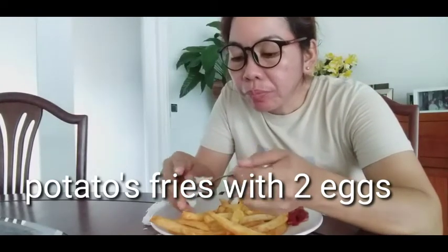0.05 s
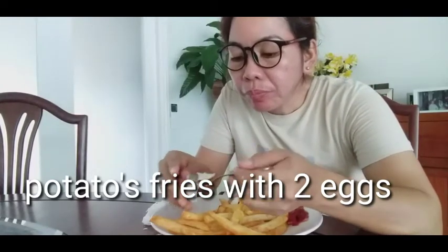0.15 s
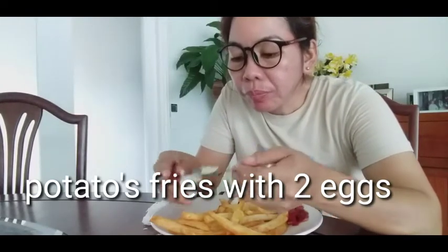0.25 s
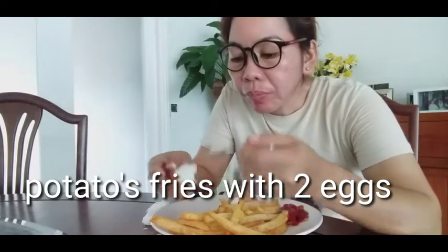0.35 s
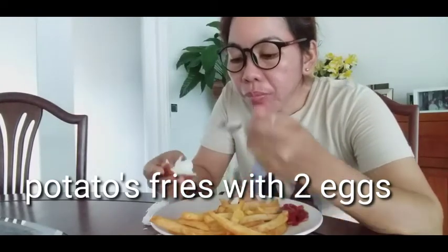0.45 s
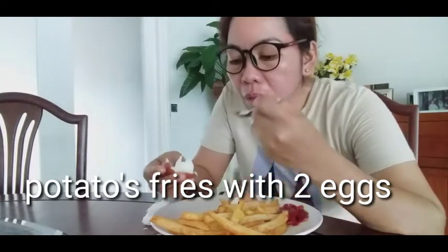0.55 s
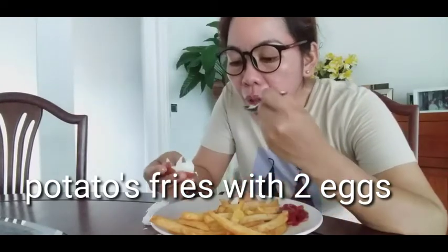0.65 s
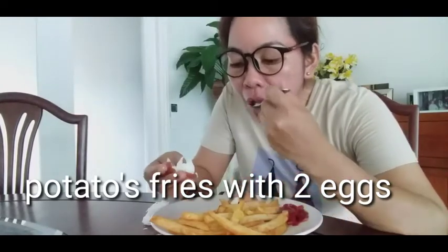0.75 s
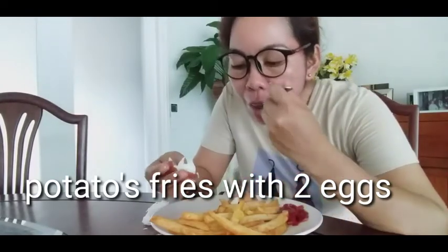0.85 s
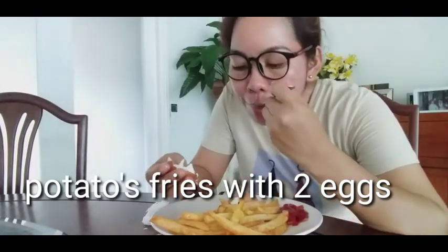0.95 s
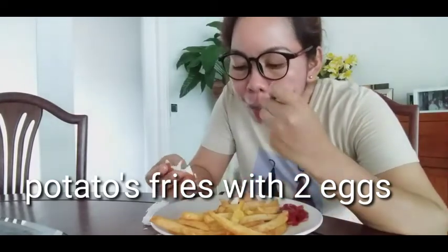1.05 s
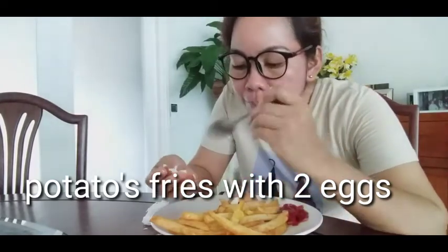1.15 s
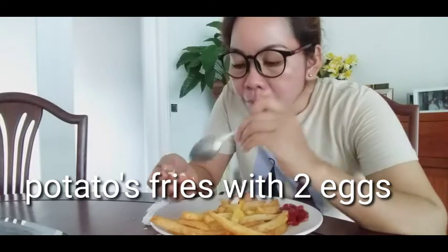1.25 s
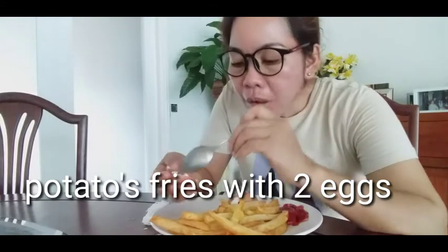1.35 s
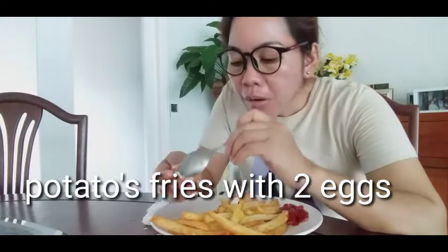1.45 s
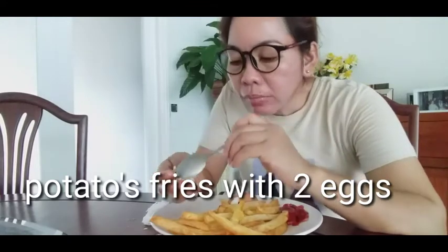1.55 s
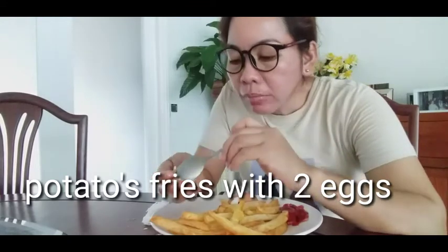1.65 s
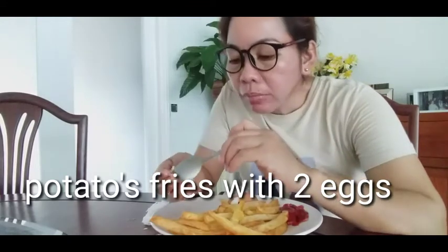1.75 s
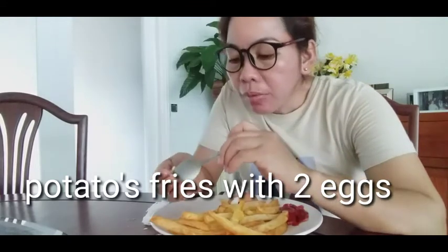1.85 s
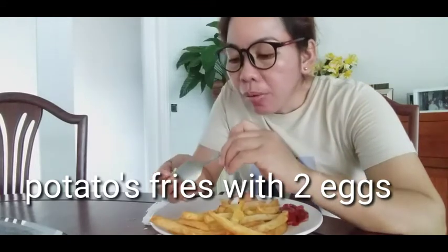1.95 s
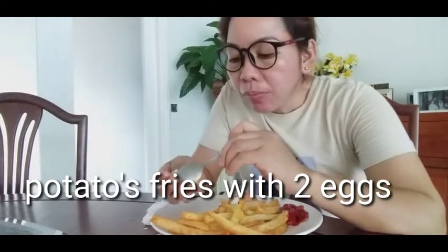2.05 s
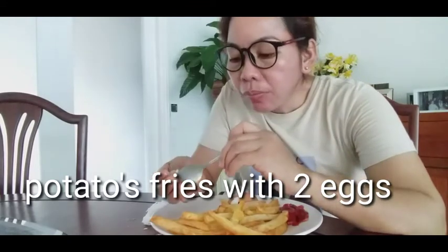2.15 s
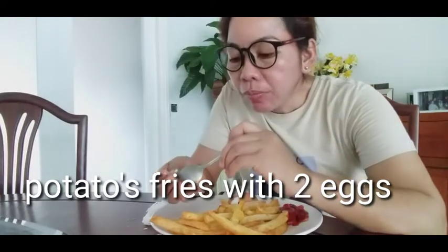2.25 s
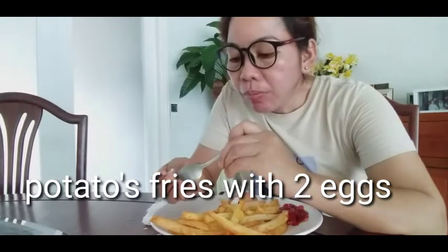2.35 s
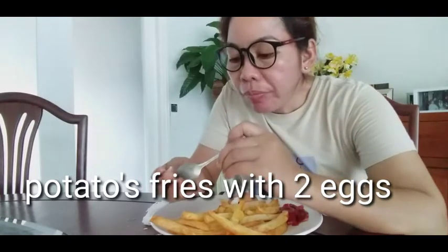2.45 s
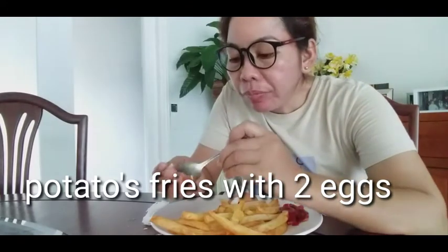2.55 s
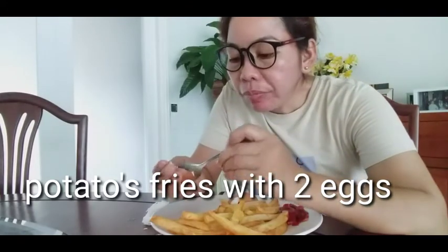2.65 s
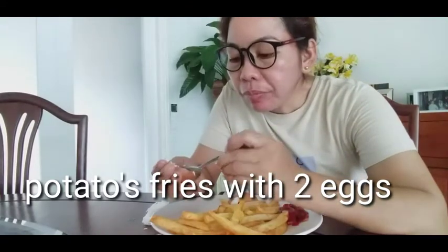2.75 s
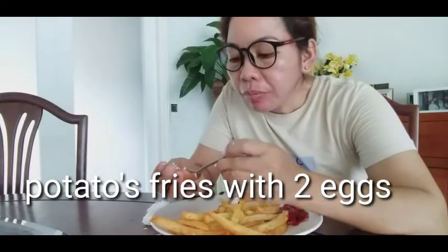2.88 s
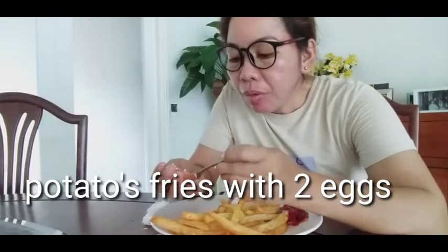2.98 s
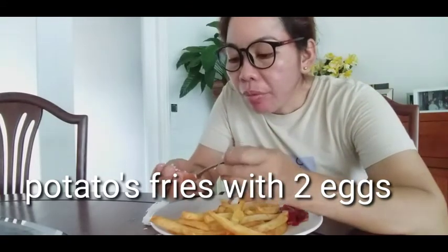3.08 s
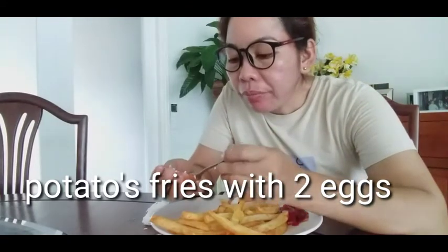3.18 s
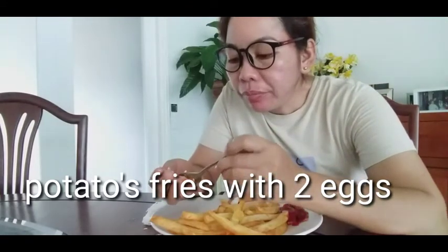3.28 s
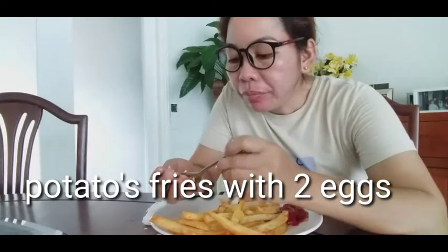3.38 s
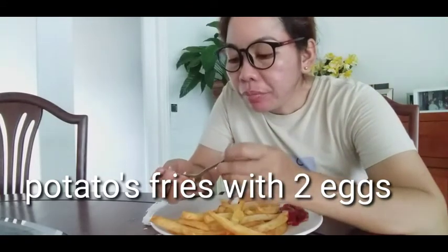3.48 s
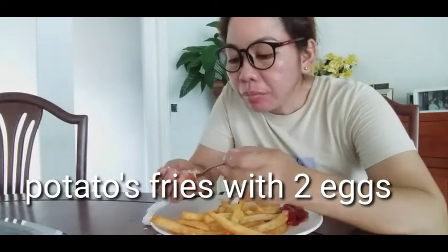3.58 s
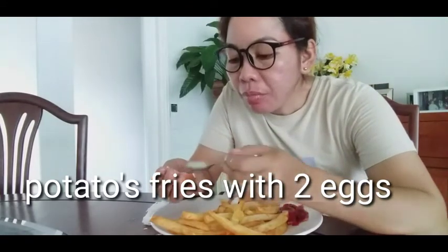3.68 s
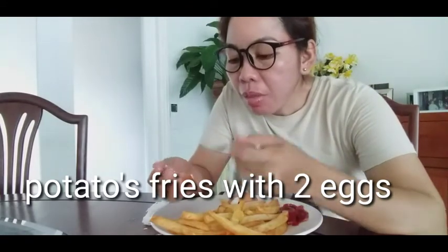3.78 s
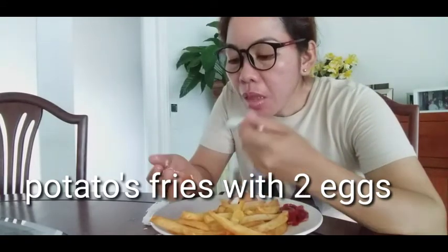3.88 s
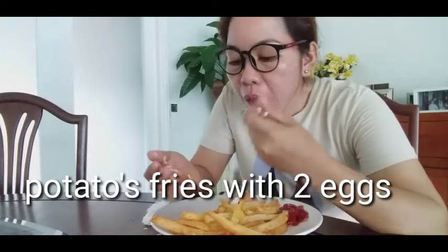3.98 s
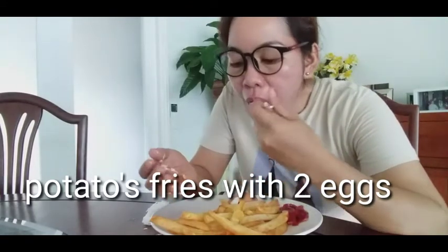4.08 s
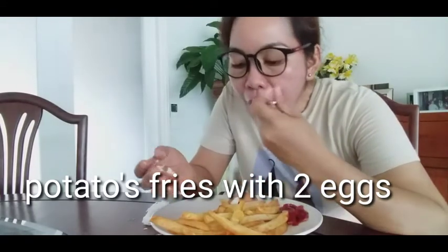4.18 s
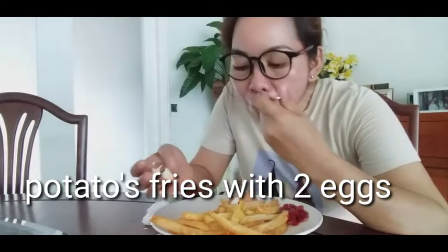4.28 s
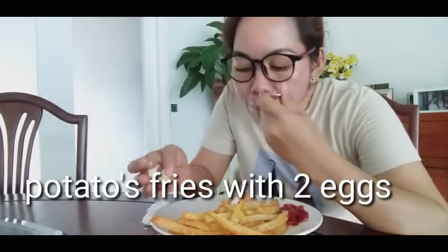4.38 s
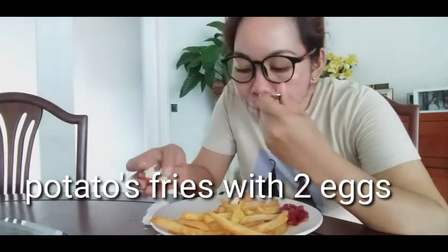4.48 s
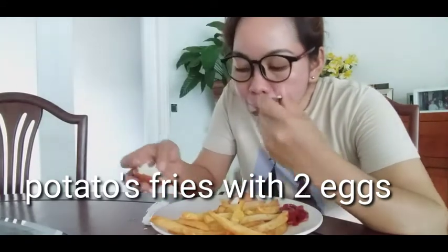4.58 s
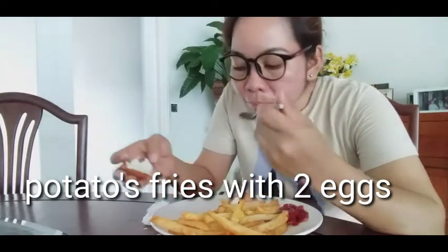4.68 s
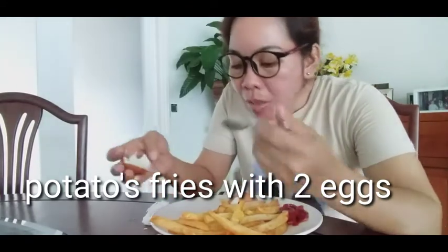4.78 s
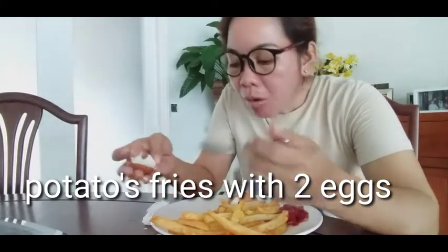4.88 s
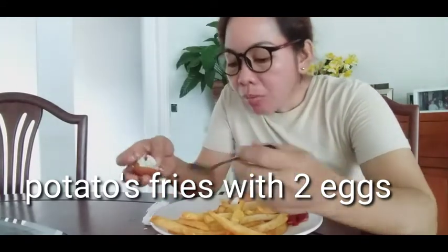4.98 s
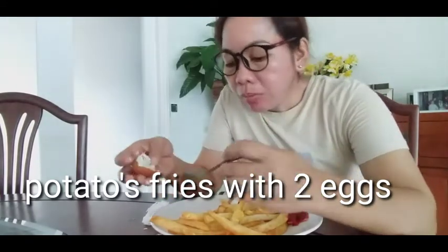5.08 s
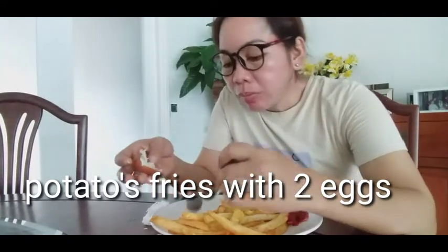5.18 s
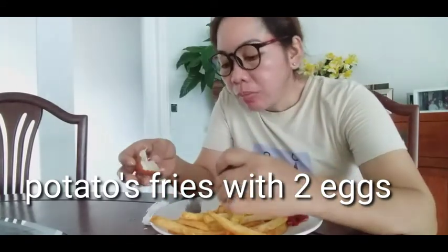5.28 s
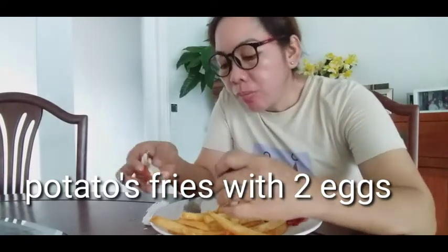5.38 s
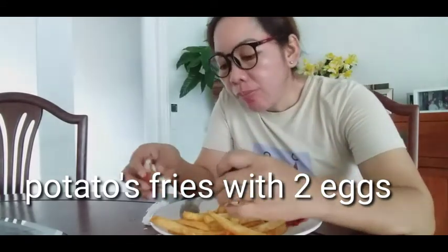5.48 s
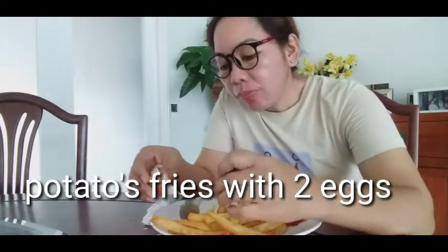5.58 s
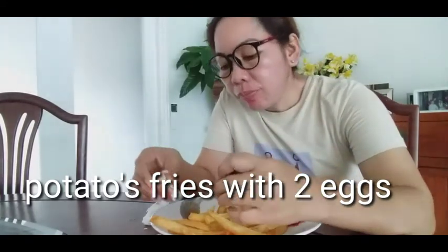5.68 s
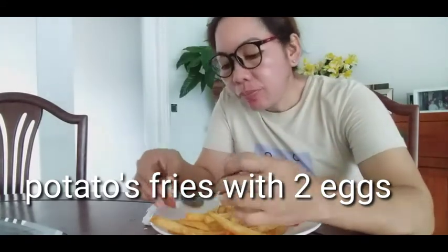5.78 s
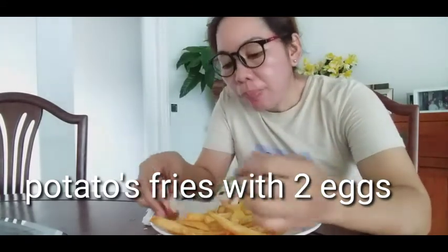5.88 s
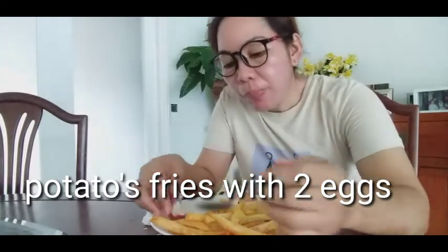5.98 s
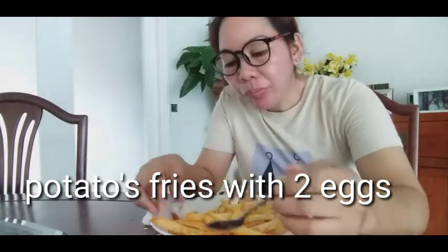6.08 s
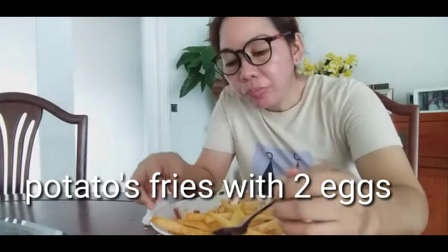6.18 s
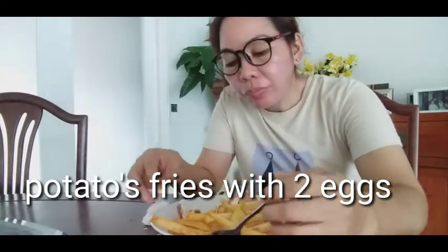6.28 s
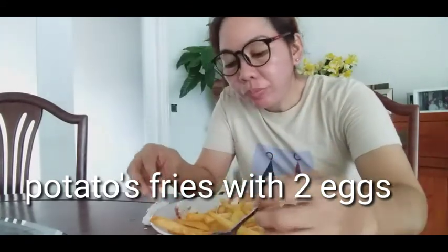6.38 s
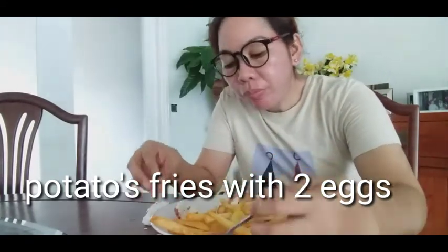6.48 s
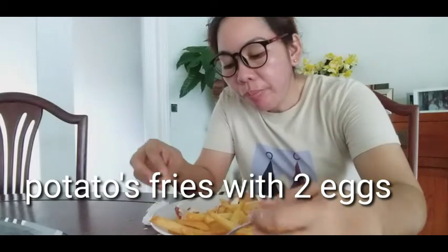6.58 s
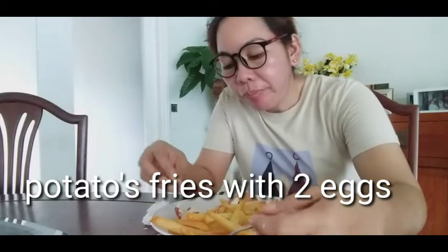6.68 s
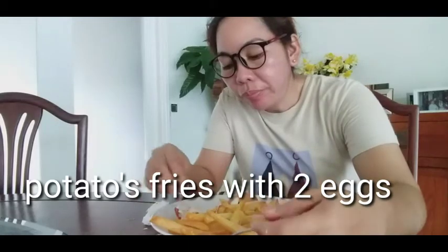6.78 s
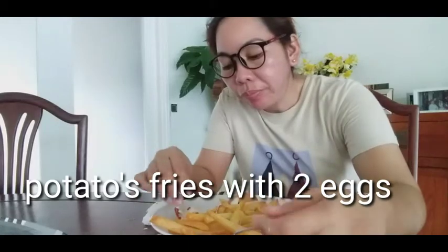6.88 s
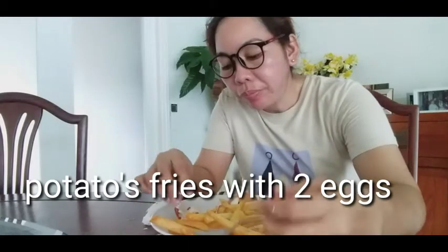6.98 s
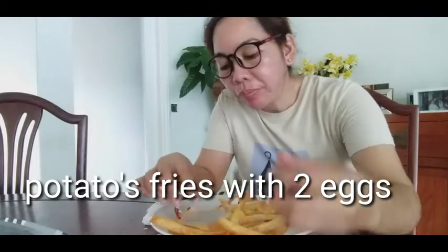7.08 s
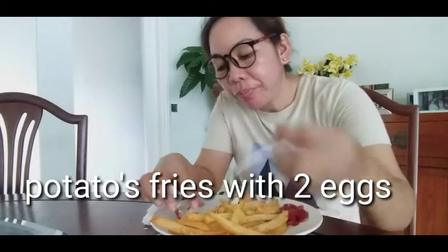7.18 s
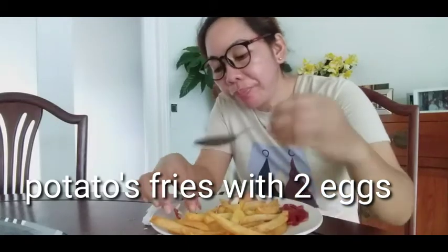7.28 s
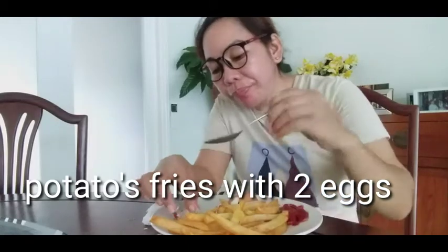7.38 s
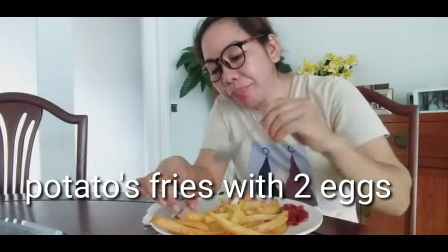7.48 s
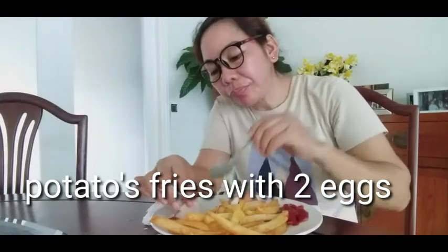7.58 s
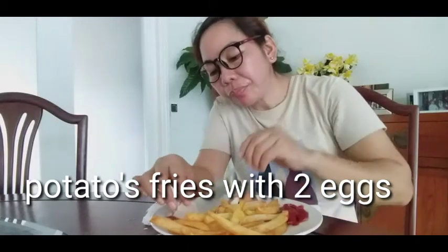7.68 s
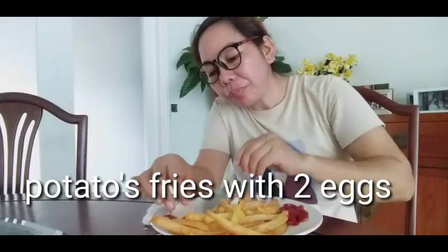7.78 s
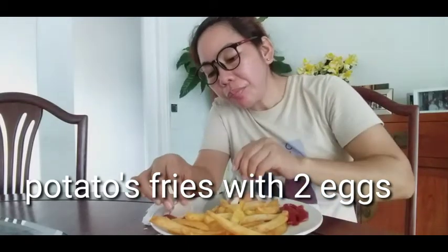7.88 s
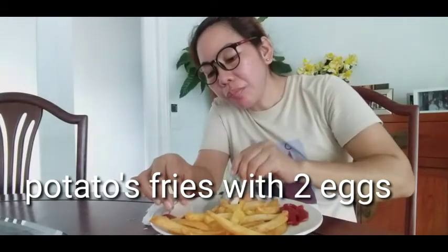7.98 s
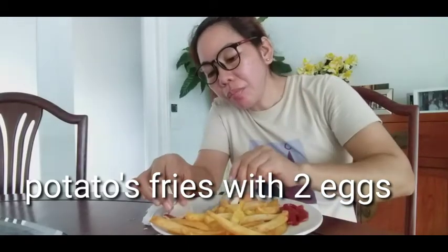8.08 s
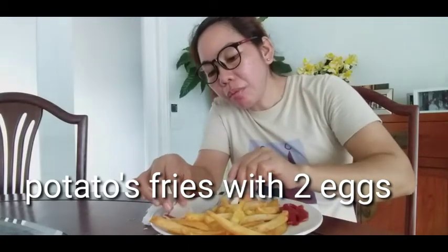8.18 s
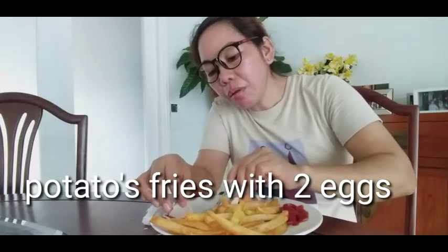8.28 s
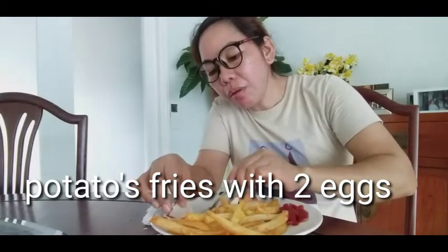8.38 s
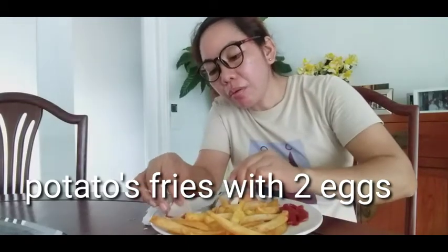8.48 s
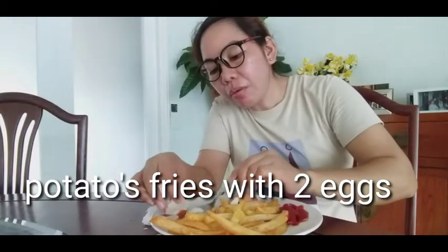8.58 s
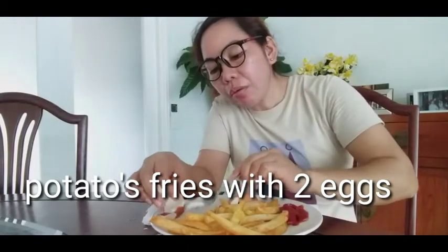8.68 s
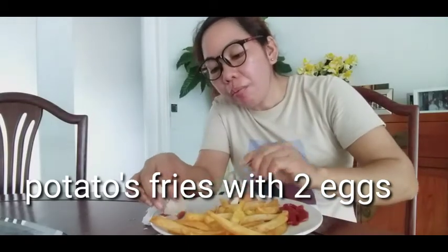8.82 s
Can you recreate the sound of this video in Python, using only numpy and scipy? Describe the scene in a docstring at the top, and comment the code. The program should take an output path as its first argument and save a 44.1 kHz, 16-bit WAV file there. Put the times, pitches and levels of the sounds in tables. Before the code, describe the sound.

Quiet table sounds, picked up by a small microphone with thin bass in a hard-walled room. A far engine rises in pitch and dies away over mains hum and hiss. After a light knock, eggshell cracks in small dry ticks, strongest early on. Later come bright metallic clinks of cutlery on a plate, three clear and one weak, ending in a short high scrape and a tiny falling squeak.

```python
"""Mains hum, room noise and a far engine, speeding up and slowly fading, come first; a light knock follows.
At a wooden dining table in a bare, ringing room, bits of eggshell then snap and crackle: bursts of noise and clicks.
Steel cutlery clinks on a ceramic plate four times, as struck modes with a crack and a thump of the table.
Last it is dragged over the glaze and squeaks as it slides off: random slips ringing damped resonances.
The microphone gets the table sounds directly and off the walls; engine and background have no added room."""
import sys
import numpy as np
from scipy import signal
from scipy.fft import rfft, irfft, next_fast_len
from scipy.io import wavfile

SR = 44100
rng = np.random.default_rng(int(sys.argv[2]) if len(sys.argv) > 2 else 0)


def log_audio(samples):
    """Write samples as a 16-bit WAV file to the path given in sys.argv[1]."""
    # one column per channel
    frames = np.atleast_2d(samples).T
    # limit to full scale, then quantise
    limited = np.clip(frames, -1, 1)
    pcm = np.round(limited * 32767).astype(np.int16)
    wavfile.write(sys.argv[1], SR, pcm)


N = 390285


def from_db(db):
    """Decibels to gain."""
    return 10 ** (np.asarray(db) / 20)


def rms_one(x):
    """Scale to rms 1."""
    return x / np.sqrt(np.mean(x ** 2) + 1e-20)


def at_hz(points, hz):
    """Read a table on a log-frequency axis."""
    known, values = np.transpose(points)
    return np.interp(np.log(hz), np.log(known), values)


def seconds(length):
    """A time axis of the given length in seconds."""
    return np.arange(int(length * SR)) / SR


def add(out, s, sound):
    """Mix a sound in at a time in seconds."""
    at = int(s * SR)
    out[at:at + len(sound)] += sound[:len(out) - at]


def band(x, low_hz, high_hz):
    """Causal band-pass, kept at least 100 Hz wide."""
    high_hz = np.clip(high_hz, low_hz + 100, 20000)
    sos = signal.butter(2, [low_hz, high_hz], "band", fs=SR, output="sos")
    return signal.sosfilt(sos, x + 1e-18)


def noise(spectrum, size, tilt_db=0):
    """Noise of a given colour, tilted by so many dB an octave; rms 1."""
    hz = np.maximum(np.fft.rfftfreq(size, 1 / SR), 1)
    gain = from_db(at_hz(spectrum, hz) + tilt_db * np.log2(hz))
    white = rng.standard_normal(size)
    return rms_one(irfft(rfft(white) * gain, size))


def fade(t, t60):
    """Exponential decay, falling 60 dB in t60 seconds."""
    return np.exp(-np.log(1000) * t / t60)


def gesture(start, length, attack, t60):
    """Envelope of a movement: rises, holds until its length is over, dies away."""
    t = np.arange(N) / SR - start
    return np.clip(t / attack, 0, 1) * fade(np.maximum(t - length, 0), t60)


def grains(per_s, spread_db):
    """Random clicks of uneven size and either sign; rms 1."""
    sizes = from_db(spread_db * np.minimum(rng.exponential(1, N), 4)) * rng.choice([-1, 1], N)
    return rms_one(sizes * (rng.random(N) < per_s / SR))


# Colour of the rumble from outdoors. Each row: frequency in Hz, relative level in dB per Hz.
RUMBLE_COLOUR = [(15, -31), (28, -19), (45, -12.5), (70, -3.5), (100, 5), (135, -6.5), (190, 0),
                 (280, -4.5), (400, -9.5), (550, -20.5), (900, -40)]
# Colour of the dull wash. Each row: frequency in Hz, relative level in dB per Hz.
WASH_COLOUR = [(200, -25.5), (400, -3.5), (600, -2), (850, 1.5), (1300, -5.5), (2200, -11.5), (4000, -33)]
# The wash gains strength unevenly. Each row: time in seconds, rms level in dB.
WASH_LEVEL_DB = [(0, -89), (2.6, -88), (3.5, -74), (5, -69.5), (6, -65), (7.3, -67.5), (8.2, -63.5),
                 (8.85, -68.5)]
# Colour of the soft hiss. Each row: frequency in Hz, relative level in dB per Hz.
HISS_COLOUR = [(300, -8), (550, -11.5), (800, -0.5), (1200, 1), (1800, -0.5), (2600, 1.5), (3800, -1.5),
               (5000, -9), (7000, -22), (10000, -24.5), (14000, -19.5), (15500, -18)]
HUM_HZ, HUM_DB, RUMBLE_DB = 99, -67.5, -58.5  # rms levels
HISS_DB, HISS_RISE_DB, HISS_SETTLE_S = -64, 3, 2  # creeps up by the rise to its level


def background():
    """Steady mains hum as one sine, with rumble from outdoors, a dull wash and soft hiss as coloured noise."""
    t = np.arange(N) / SR
    wash_s, wash_levels = np.transpose(WASH_LEVEL_DB)
    wash_db = np.interp(t, wash_s, wash_levels)
    hiss_db = HISS_DB - HISS_RISE_DB * np.exp(-t / HISS_SETTLE_S)
    out = from_db(HUM_DB) * np.sqrt(2) * np.sin(2 * np.pi * HUM_HZ * t)
    for level_db, colour in [(RUMBLE_DB, RUMBLE_COLOUR), (wash_db, WASH_COLOUR), (hiss_db, HISS_COLOUR)]:
        out = out + from_db(level_db) * noise(colour, next_fast_len(N))[:N]
    return out


# Narrow resonances that boom as an engine harmonic sweeps through them.
# Each row: centre in Hz, width in Hz at about half amplitude, peak rms level in dB before the fade.
ENGINE_BOOMS = [(71, 4, -62), (148, 2.4, -55.5), (155.2, 5, -57), (162, 3, -52.5), (169.5, 1.2, -61),
                (203.8, 11, -54), (230.9, 5, -58.5), (242, 2.9, -57), (355.7, 8.04, -68), (439, 18, -69)]
# the firing rate settles exponentially towards a top speed
ENGINE_START_HZ, ENGINE_TOP_HZ, ENGINE_SETTLE_S = 65.5, 87.1, 1.35
ENGINE_FLOOR_DB = -80.5  # each harmonic away from any resonance, before the fade
ENGINE_FADE_DB_PER_S = 1.55


def engine(count=6):
    """Only the low harmonics get through the walls; each swells as it passes a resonance."""
    t = np.arange(N) / SR
    firing_hz = ENGINE_TOP_HZ + (ENGINE_START_HZ - ENGINE_TOP_HZ) * np.exp(-t / ENGINE_SETTLE_S)
    out = 0
    for multiple in range(1, count + 1):
        hz = multiple * firing_hz
        boom = 0
        for centre_hz, width_hz, peak_db in ENGINE_BOOMS:
            off_centre = 1.2 * (hz - centre_hz) / width_hz
            boom = boom + from_db(peak_db) / (1 + off_centre ** 2) ** 2
        tone = np.sqrt(2) * np.sin(2 * np.pi * np.cumsum(hz) / SR)
        out = out + np.maximum(boom, from_db(ENGINE_FLOOR_DB)) * tone
    return out * from_db(-ENGINE_FADE_DB_PER_S * t)


# Light touches of the cutlery and a soft bump. Each row: start in seconds, onset level in dB,
# lowest Hz, highest Hz, t60 in seconds, send to the walls in dB.
LIGHT_KNOCKS = [(0.612, -47.5, 2050, 3970, 0.019, -1.5), (5.212, -26, 3380, 4630, 0.011, -10),
                (7.357, -52.5, 353, 2620, 0.067, 6)]
# Pieces of eggshell snap. Each row: start in seconds, onset level in dB, lowest Hz, highest Hz.
SHELL_SNAPS = [(1.425, -47.5, 3680, 6900), (1.456, -47, 3600, 6470), (1.473, -41.5, 3600, 5030),
               (1.61, -52, 4000, 6900), (1.63, -50, 4000, 7000), (2.064, -49, 5470, 15000),
               (2.095, -46, 4370, 9800), (2.183, -30, 1600, 10400), (2.194, -35.5, 2600, 15000),
               (2.26, -48, 4500, 14000), (2.316, -38, 4360, 8330), (2.329, -46, 4700, 14100),
               (2.582, -53.5, 4500, 7950), (2.691, -51, 3820, 9100), (2.819, -49, 4400, 6350),
               (3.033, -43.5, 4800, 10300), (3.217, -47, 4460, 8850), (3.263, -45, 2380, 10200),
               (4.389, -51, 4740, 8100), (4.473, -48.5, 4680, 9200), (5.057, -46.5, 3940, 7200)]
SNAP_T60_S, SNAP_ROOM_DB = 0.012, -2.5
CUTOFF_HZ = 15700  # top of the microphone's range and of the ticks' sparkle


def ticks(sparkle_db=-18):
    """Knocks and shell snaps are short noise bursts; returns the direct sound and the part for the walls."""
    direct, to_walls, t = np.zeros(N), np.zeros(N), seconds(.1)
    snaps = [(*snap, SNAP_T60_S, SNAP_ROOM_DB) for snap in SHELL_SNAPS]
    for s, level_db, low_hz, high_hz, t60, room_db in snaps + list(LIGHT_KNOCKS):
        white, shape = rng.standard_normal(len(t)), fade(t, t60)
        body = rms_one(band(band(white, low_hz, high_hz), low_hz, high_hz))
        sparkle = from_db(sparkle_db) * band(white, low_hz, CUTOFF_HZ)
        burst = rms_one((body + sparkle) * shape)
        # scaled by the envelope's rms, so the level is that of the onset
        tick = from_db(level_db) * burst * np.sqrt(np.mean(shape ** 2))
        add(direct, s, tick)
        add(to_walls, s, tick * from_db(room_db))
    return direct, to_walls


# The fingers press on the shell. Each row: start in seconds, length in seconds, crackle level in dB.
FINGER_PRESSES = [(1.437, 0.057, -66.5), (1.576, 0.057, -68), (1.74, 0.026, -65), (2.059, 0.055, -70),
                  (2.188, 0.05, -59.5), (2.28, 0.045, -64), (2.455, 0.17, -70), (2.74, 0.11, -69),
                  (3.004, 0.039, -65), (3.245, 0.14, -72), (4.376, 0.12, -73), (5.06, 0.14, -72),
                  (5.576, 0.026, -61)]
PRESS_ATTACK_S, PRESS_T60_S = 0.015, 0.22
HANDLING_START_S, HANDLING_DB = 1.6, -85  # faint crackle once the egg is turned in the hand


def crackle(sparkle_db=-8):
    """Shell and food give way in many tiny breaks, louder under each press of the fingers."""
    force = from_db(HANDLING_DB) * (np.arange(N) / SR > HANDLING_START_S)
    for s, length, level_db in FINGER_PRESSES:
        press = from_db(level_db) * gesture(s, length, PRESS_ATTACK_S, PRESS_T60_S)
        force = np.maximum(force, press)
    breaks = band(grains(per_s=520, spread_db=5.5), low_hz=4080, high_hz=15500)
    body = band(breaks, low_hz=3900, high_hz=7740)
    return force * rms_one(body + from_db(sparkle_db) * breaks)


def mode(hz, t60, rise):
    """One struck mode, swelling while the contact lasts (rise in seconds)."""
    t = seconds(.4)
    tone = np.sin(2 * np.pi * (hz * t + rng.random()))
    return tone * fade(t, t60) * (1 - np.exp(-t / rise))


# Cutlery meets plate. Each row: start in seconds, ring gain in dB, crack gain in dB, crack tilt in
# dB per octave, table thump gain in dB, thump tilt in dB per octave, send to the walls in dB.
PLATE_CLINKS = [(5.3114, 0, -21.5, 3, -34, 1.5, -3), (5.9370, -1.5, -45.5, 2, -56, 1.5, -1),
                (6.2505, 1.5, -16, 0.6, -31, -2, -4), (7.8714, 1, -30.5, 0.5, -39.5, -1, -1.5)]
# Modes of plate and cutlery. Each row: centre of a beating pair in Hz, t60 in seconds,
# then relative level in dB at each of the four places struck.
STRUCK_MODES = [(637, 0.1, -39, -52, -31, -45), (1263, 0.1, -38, -53.5, -54, -54),
                (1670, 0.15, -42, -83.5, -42.5, -51), (1930, 0.21, -29, -45.5, -28, -49),
                (2795, 0.14, -58, -43, -29, -44), (3057, 0.2, -30.5, -73, -46.5, -31),
                (3220, 0.07, -35, -75, -28, -33.5), (3682, 0.24, -36, -50.5, -24, -73),
                (3738, 0.074, -65, -70, -19, -68), (4070, 0.04, -38, -50.5, -24, -56),
                (4280, 0.11, -22, -52.5, -28, -33), (4370, 0.072, -15.5, -59.5, -43, -27),
                (4650, 0.07, -19, -68, -15.5, -31.5), (4727, 0.066, -28.5, -57, -20.5, -36),
                (4723, 0.3, -36, -48, -16.5, -41), (4860, 0.07, -56.5, -44, -18.5, -56),
                (5180, 0.11, -20.5, -47, -22.5, -38), (5830, 0.058, -22, -69.5, -45, -34.5),
                (5970, 0.13, -23, -73.5, -35.5, -50.5), (6870, 0.03, -48, -63, -23, -62),
                (7360, 0.11, -26, -67.5, -35, -36), (8560, 0.17, -32, -71, -25, -39),
                (8800, 0.08, -30.5, -72, -60, -31), (9060, 0.08, -43, -93, -29, -48),
                (10190, 0.16, -34.5, -70.5, -26.5, -41.5), (10250, 0.061, -40.5, -62.5, -46.5, -33),
                (11800, 0.07, -31.5, -54.5, -27.5, -43), (11690, 0.047, -29.5, -66.5, -64, -32),
                (14500, 0.05, -29.5, -78.5, -46, -36), (14900, 0.04, -36, -69, -58, -43)]
# Colour of a contact's crack. Each row: frequency in Hz, relative level in dB per Hz.
CRACK_COLOUR = [(40, -35.5), (110, 1), (300, 2.5), (430, -17.5), (620, 4), (900, -7.5), (1500, -1.5),
                (2600, 0), (4200, -8), (6000, -1), (9000, -10.5), (13000, -18), (15000, -15.5)]
# Modes of the table top under the plate. Each row: frequency in Hz, relative level in dB, t60 in seconds.
TABLE_MODES = [(101, -13.5, 0.12), (129, -5, 0.15), (164, -4.5, 0.085), (192, 1, 0.11), (268, 0, 0.12),
               (346.7, 1, 0.062), (474, 3, 0.046), (775, -14.5, .035)]
THUMP_CENTRE_HZ = 200  # the thump's tilt pivots here


def blow(place, crack_t60, split=0.0031):
    """One contact: a crack, the modes that the place struck favours, and a thump of the table."""
    ring_db, crack_db, tilt_db, thump_db, thump_tilt_db = PLATE_CLINKS[place][1:6]
    t = seconds(.4)
    ring, thump = 0, 0
    for hz, t60, *place_db in STRUCK_MODES:
        # nothing is perfectly symmetric, so every mode is a close, beating pair
        beat = np.cos(2 * np.pi * split * hz * t)
        ring = ring + from_db(place_db[place]) * mode(hz, t60, rise=0.00055) * beat
    for hz, level_db, t60 in TABLE_MODES:
        tilted_db = level_db + thump_tilt_db * np.log2(hz / THUMP_CENTRE_HZ)
        thump = thump + from_db(tilted_db) * mode(hz, t60, rise=.003)
    crack = noise(CRACK_COLOUR, len(t), tilt_db) * fade(t, crack_t60) * (1 - np.exp(-t / 0.00077))
    return from_db(ring_db) * ring + from_db(crack_db) * crack + from_db(thump_db) * thump


def clinks():
    """Each blow radiates differently to the microphone and to the walls, where scattering draws the crack out."""
    direct, to_walls = np.zeros(N), np.zeros(N)
    for place, (s, *_, room_db) in enumerate(PLATE_CLINKS):
        add(direct, s, blow(place, crack_t60=0.034))
        add(to_walls, s, blow(place, crack_t60=.07) * from_db(room_db))
    return direct, to_walls


STROKE_ATTACK_S, STROKE_T60_S = 0.027, 0.2


def drag(stroke, resonances, sag_octaves_per_s, slips_per_s):
    """The steel sticks and slips on the glaze; each slip rings damped resonances that sink as the contact moves."""
    s, length, level_db, tilt_db, pitch = stroke
    start, end = int(s * SR), int((s + length + STROKE_T60_S) * SR)
    slips = grains(slips_per_s, spread_db=1.5)[start:end]
    bend = pitch * 2 ** (-sag_octaves_per_s * np.arange(len(slips)) / SR)
    out, power = np.zeros(N), 0
    for hz, width_hz, mode_db in resonances:
        # shift the gliding resonance to 0 Hz, ring a double pole there and shift back
        r = np.exp(-np.pi * width_hz / SR)
        turn = np.exp(2j * np.pi * hz * np.cumsum(bend) / SR)
        rung = np.real(turn * signal.lfilter([1], [1, -2 * r, r * r], slips / turn))
        gain = from_db(mode_db + tilt_db * np.log2(hz / SR))
        out[start:end] += gain * rms_one(rung)
        power = power + gain ** 2
    return out * from_db(level_db) / np.sqrt(power) * gesture(s, length, STROKE_ATTACK_S, STROKE_T60_S)


# Steel dragged over the glaze. Each row: start in seconds, length in seconds, level in dB,
# tilt in dB per octave, starting pitch ratio.
PLATE_DRAGS = [(7.885, 0.037, -48.5, 9, 1), (7.985, 0.058, -45.5, 1, 1.005), (8.033, 0.08, -44, 1, 1)]
# Resonances of the steel pressed on the plate, the widest being plain friction hiss.
# Each row: frequency in Hz, width in Hz of each of two poles, relative level in dB before tilt.
PRESSED_STEEL = [(1870, 72, 2.5), (1980, 38, 2), (2804, 77, -2), (3070, 120, -4), (4500, 320, -8.5),
                 (5980, 330, -3), (8940, 140, -23), (10420, 420, -18), (12000, 550, -30), (15000, 900, -23),
                 (8200, 8100, -8.5)]
# A short falling squeak. Each row: start in seconds, length in seconds, level in dB,
# tilt in dB per octave, starting pitch ratio.
SLIDE_SQUEAKS = [(8.368, 0.042, -53, 1, 1.01)]
# Resonances of the steel as it slides off. Each row: frequency in Hz, width in Hz of each of two poles,
# relative level in dB before tilt.
SLIDING_STEEL = [(2900, 280, -0.5), (4370, 220, 2), (5780, 890, 0), (10400, 950, -13.5),
                 (14900, 800, -15.5)]


def scrapes():
    """The steel is drawn over the plate, then slides off it with a faster fall in pitch."""
    out = np.zeros(N)
    for stroke in PLATE_DRAGS:
        out += drag(stroke, PRESSED_STEEL, sag_octaves_per_s=0.1, slips_per_s=2300)
    for stroke in SLIDE_SQUEAKS:
        out += drag(stroke, SLIDING_STEEL, sag_octaves_per_s=1.1, slips_per_s=4500)
    return out


# The bare room's reverberation. Each row: frequency in Hz, t60 in seconds, relative level in dB per Hz.
ROOM_DECAY = [(100, 1, 6.5), (250, 1, -1), (700, .58, 0), (1400, 0.73, 2), (1960, 0.48, -2),
              (3080, 0.78, 2), (4500, 0.61, -2.5), (8140, 0.56, -3.5), (15100, 0.4, 4.5)]


def room(x, first_echo=0.0013, build_up=0.00048):
    """Dense reflections, as noise that dies band by band, the highest treble soonest; times in seconds."""
    t = seconds(.9)
    white, hz = rfft(rng.standard_normal(len(t))), np.fft.rfftfreq(len(t), 1 / SR)
    edges, tail = np.geomspace(40, 20000, 17), 0
    decay = np.array(ROOM_DECAY)
    for low, high in zip(edges, edges[1:]):
        centre_hz = np.sqrt(low * high)
        t60 = at_hz(decay[:, [0, 1]], centre_hz)
        level_db = at_hz(decay[:, [0, 2]], centre_hz)
        band_noise = irfft(white * (hz >= low) * (hz < high), len(t))
        tail = tail + from_db(level_db) * band_noise * fade(t, t60)
    tail = tail * (1 - np.exp(-np.maximum(t - first_echo, 0) / build_up))
    return signal.fftconvolve(x, tail / np.sqrt(np.sum(tail ** 2)))[:N]


def scene():
    """Everything on the table is heard directly and off the walls, over the engine and background."""
    blows, blows_to_walls = clinks()
    snaps, snaps_to_walls = ticks()
    scrape = scrapes()
    shell = crackle()
    to_walls = blows_to_walls + from_db(-4.5) * scrape + from_db(2.5) * (shell + snaps_to_walls)
    table = blows + scrape + shell + snaps
    return (table + room(to_walls) + engine() + background())[None]


LOW_CUT_HZ = 52


def record(dry):
    """A small microphone loses the deep bass; the top is cut steeply."""
    low_cut = signal.butter(3, LOW_CUT_HZ, "high", fs=SR, output="sos")
    top_cut = signal.ellip(10, .2, 80, CUTOFF_HZ, fs=SR, output="sos")
    thin = signal.sosfilt(low_cut, dry)
    return signal.sosfilt(top_cut, thin)


dry = scene()
out = record(dry)
log_audio(out)
```